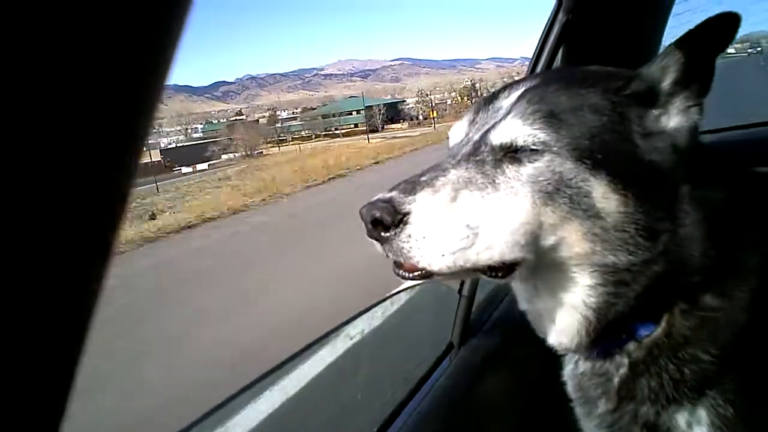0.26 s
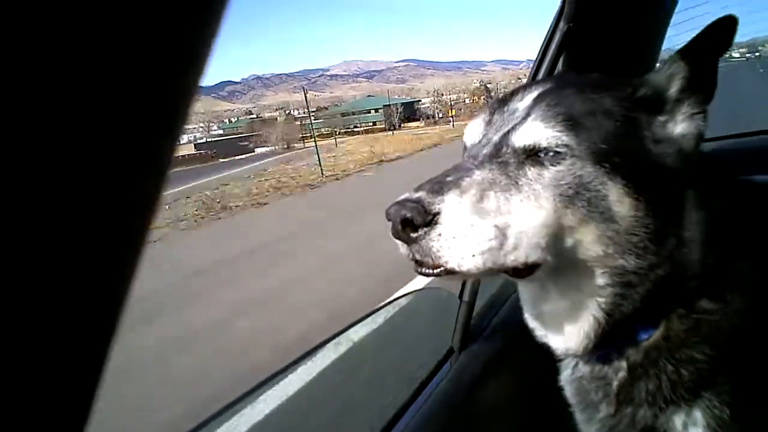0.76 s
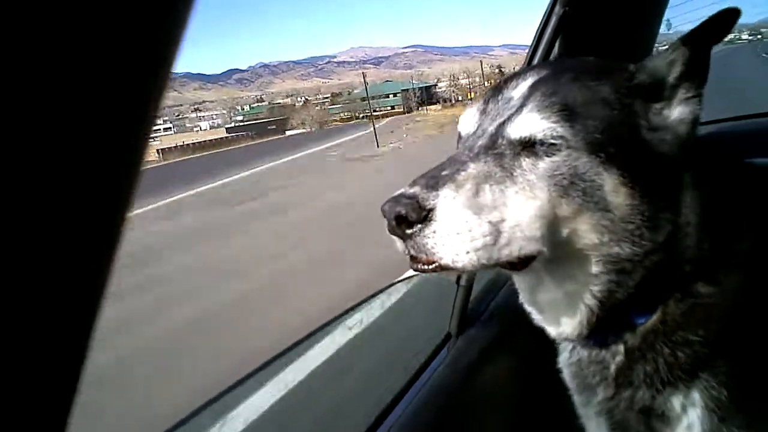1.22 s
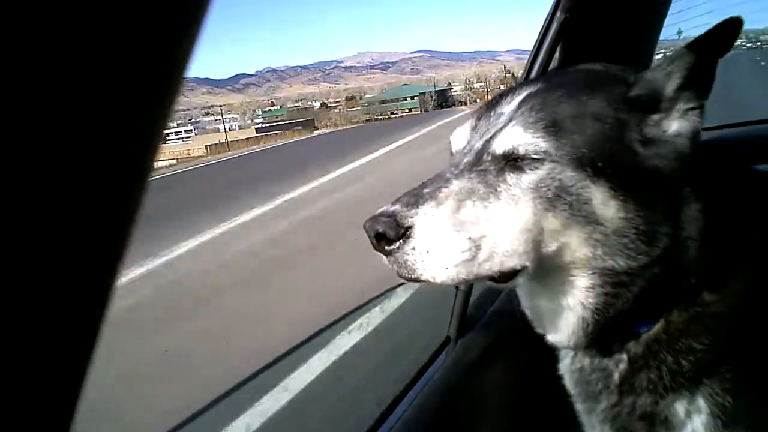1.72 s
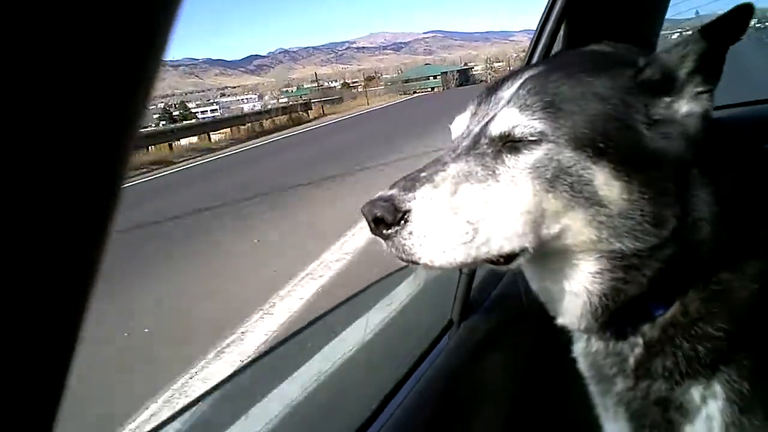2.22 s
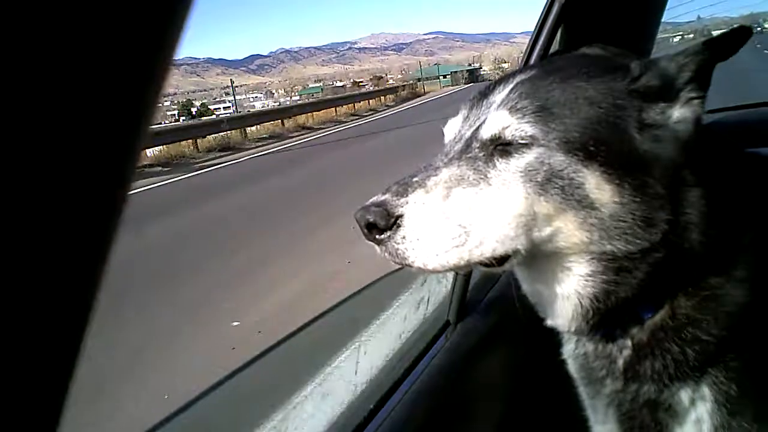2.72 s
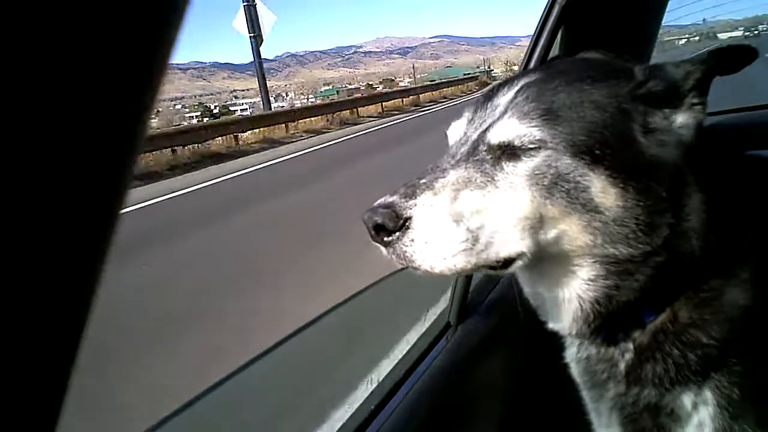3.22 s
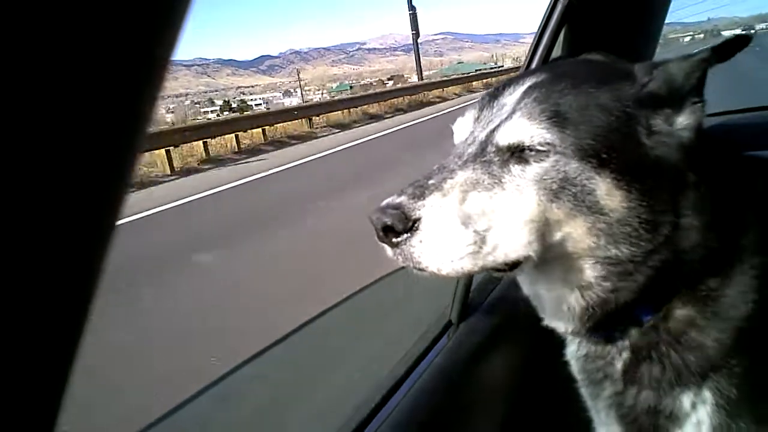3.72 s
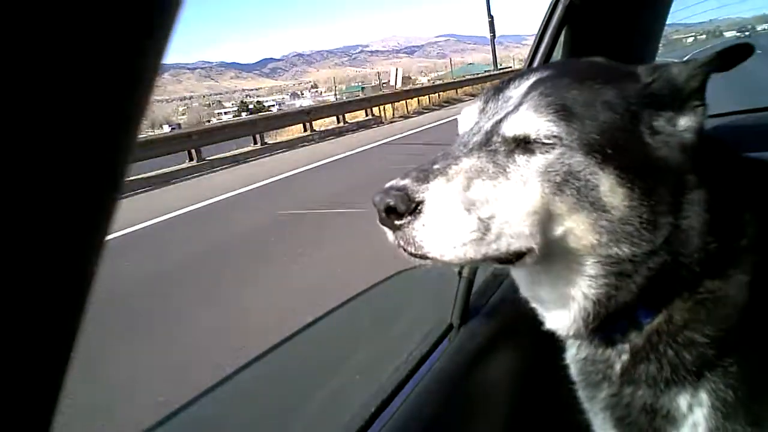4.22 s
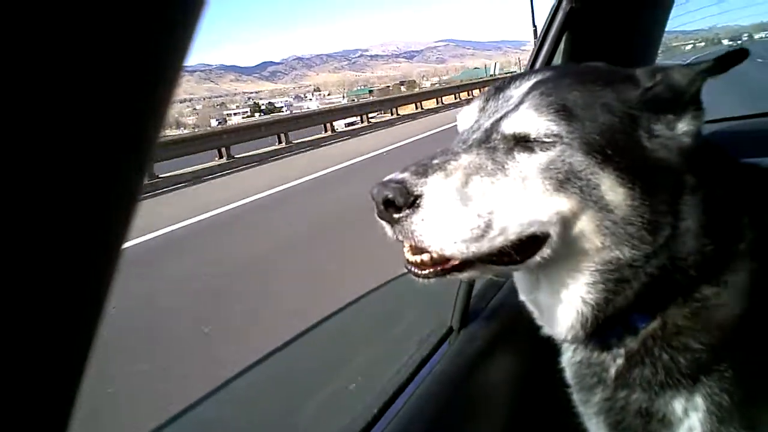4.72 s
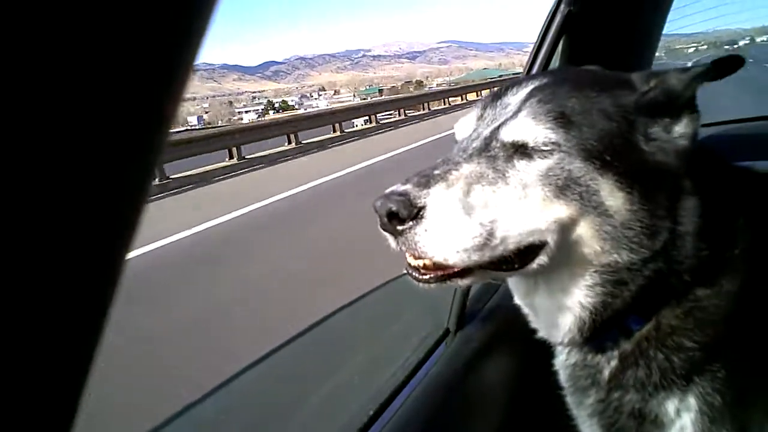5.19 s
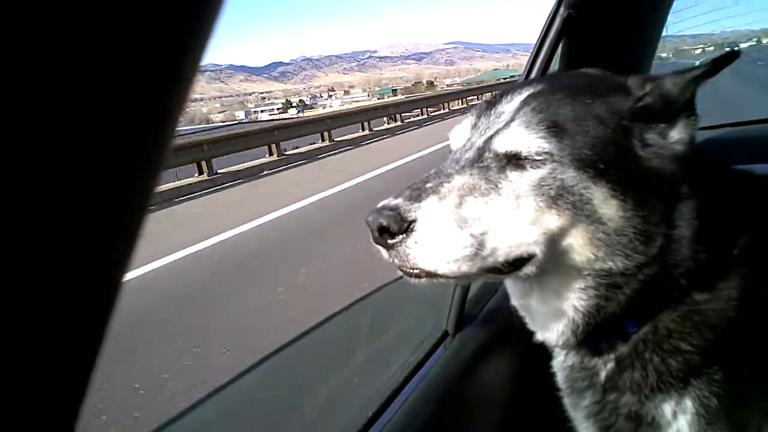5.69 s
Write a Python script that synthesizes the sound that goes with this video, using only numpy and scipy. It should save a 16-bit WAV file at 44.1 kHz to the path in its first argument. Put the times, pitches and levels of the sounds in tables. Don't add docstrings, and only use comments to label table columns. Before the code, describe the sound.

Continuous turbulent air roars past an open car window, fluttering rapidly and heard very close. Tyres make a steady midrange wash, the window edge hisses in gusts. Hard blows hit the microphone near 0.8, 3 and 4.8 seconds, with short low cabin thuds. Tiny spits and ticks scatter through the later part. The deep rumble is thin, and the dog stays silent.

```python
import sys
import numpy as np
from scipy import signal
from scipy.fft import rfft, irfft, next_fast_len
from scipy.io import wavfile
from scipy.ndimage import uniform_filter1d, map_coordinates

SR = 44100
rng = np.random.default_rng(int(sys.argv[2]) if len(sys.argv) > 2 else 0)


def nominal_scale(level):
    x = np.asarray(level, float) / 20
    return 10 ** x


def store_wav(level_fs):
    pcm = np.round(np.clip(np.atleast_2d(level_fs), -1, 1) * 32767)
    wavfile.write(sys.argv[1], SR, pcm.T.astype(np.int16))


N = 262395
WIND_FILTER_HZ, WIND_FILTER_Q = 232, 0.89

# (frequency [Hz], density [dB per Hz])
SEAL_COLOUR = [(2000, -30), (3000, 4.5), (4000, -3), (5500, -7), (7500, -16), (10000, -18), (13000, -40)]


def unit(x):
    return x / np.sqrt(np.mean(x ** 2) + 1e-20)


def wobble(rate):
    knots = rng.standard_normal(int(N * rate / SR) + 4)
    return unit(map_coordinates(knots, [np.arange(N) * rate / SR]))


def quick(rate):
    x = wobble(rate)
    return unit(x - uniform_filter1d(x, size=SR // 9))


def filtered(x, response):
    m = next_fast_len(N + 8192)
    return irfft(rfft(x, m) * response(np.fft.rfftfreq(m, 1 / SR)), m)[:N]


def wind_filter(hz):
    u = 1j * hz / WIND_FILTER_HZ
    return u * u / (u * u + u / WIND_FILTER_Q + 1)


def rush(spectrum, patchy_db, lumps_db):
    z = signal.stft(rng.standard_normal(N), nperseg=512)[2]
    field = uniform_filter1d(rng.standard_normal(z.shape), size=6, axis=0)
    field = uniform_filter1d(field, size=8, axis=1)
    noise = signal.istft(z * nominal_scale(patchy_db * unit(field)), nperseg=512)[1][:N]
    f, db = np.transpose(spectrum)

    def colour(hz):
        return nominal_scale(np.interp(np.log(hz + 1), np.log(f), db, -120, -120))

    x = filtered(noise * nominal_scale(lumps_db), colour)
    return x / np.std(filtered(x, wind_filter))


def stream():
    # (time [s], strength [dB], brightness [dB])
    drift = [
        (0.0, 5.5, 0.3),
        (0.99, 1.0, 0.7),
        (1.98, -1, -0.8),
        (2.98, -1.03, -0.86),
        (3.97, -4.5, 1.2),
        (4.96, -2.13, 0.5),
        (5.95, -2.26, 0.5),
    ]
    # (middle [s], length [s], rise [dB], brightness [dB])
    gusts = [(0.5, 0.31, 2.7, -0.6), (0.77, 0.059, 3, -1.5), (0.79, 0.081, 4.2, -1), (0.94, 0.18, 5, 0.5),
             (1.29, 0.051, 1.5, -1.5), (1.5, 0.14, 1.5, -1), (1.81, 0.3, 7, -0.1), (1.95, 0.13, 3.5, -0.8),
             (2.01, 0.18, 5.5, 1), (2.06, 0.094, 5, 0.0), (2.21, 0.13, 1.5, 2.5), (2.52, 0.35, -3, 1.2),
             (2.66, 0.064, 4, -0.7), (2.86, 0.048, 5, 0.5), (2.94, 0.071, 3.5, 0), (2.98, 0.061, 5.5, -1),
             (3.15, 0.11, 4.5, -0.5), (3.36, 0.4, -3, 0.4), (3.53, 0.083, 4.5, 0.3),
             (3.69, 0.06, 0.2, -3.5), (3.76, 0.08, 2, -2.7), (3.86, 0.11, -3, -5.5), (3.95, 0.11, 3, -1.5),
             (4.35, 0.089, 4.5, -1.5), (4.49, 0.18, 5.5, -0.2), (4.67, 0.16, 6.5, -0.8),
             (4.79, 0.22, 8, -2), (5.27, 0.19, 4, -1.5), (5.42, 0.15, 4, 0.5), (5.89, 0.27, 5, -1.7)]
    # (middle [s], length [s], rise [dB], brightness [dB])
    lulls = [
        (1.106, 0.066, -4, 1),
        (1.587, 0.12, -2, -1.5),
        (2.123, 0.065, -2, 1),
        (4.038, .05, -3, 0),
        (4.412, .05, 0, -3),
        (4.885, 0.052, -3.5, 2.5),
    ]
    t = np.arange(N) / SR
    s, *curves = np.transpose(drift)
    strength_db, bright_db = (np.interp(t, s, curve) for curve in curves)
    for middle, length, rise_db, tilt_db in [*gusts, *lulls]:
        swell = np.cos(np.pi * np.clip((t - middle) / length, -.5, .5)) ** 2
        strength_db = strength_db + rise_db * swell
        bright_db = bright_db + tilt_db * swell
    return strength_db, bright_db


def road_rumble():
    # (frequency [Hz], density [dB per Hz])
    floor_colour = [(12, -10), (25, 8), (40, 0), (70, -12), (120, -38)]
    return nominal_scale(-74) * rush(floor_colour, patchy_db=0.5, lumps_db=0)


def airflow():
    # (frequency [Hz], density [dB per Hz])
    buffet_colour = [(20, -28), (45, 0), (70, 2.5), (100, -0.5), (150, -4), (210, -5), (280, -4.5),
                     (380, -8), (480, -17.5), (900, -54)]
    roar_colour = [(200, -48), (350, -7.5), (450, -0.5), (600, -2), (820, -1.5), (1000, -5.5), (1300, -15),
                   (2200, -39)]
    tyre_colour = [(600, -12), (1000, -2.5), (1300, -2), (1700, -1.5), (2100, -6.5), (2700, -17),
                   (4000, -36)]
    edge_colour = [(1500, -13), (2700, -3), (3500, 0.5), (4300, -6.5), (5000, -6), (6000, -10.5),
                   (7000, -8), (8300, -13), (10000, -18), (12000, -27.5), (13500, -28.5), (16000, -31)]
    # (mean level [dB], share of strength [dB per dB], share of brightness [dB per dB])
    layers = [
        (-44, 0.93, -0.66),
        (-45.5, 0.97, -0.41),
        (-51.5, 0.86, 0.24),
        (-58.5, 1.03, 1.2),
    ]
    strength_db, bright_db = stream()
    buffet_db, roar_db, tyre_db, edge_db = (
        db + grows * strength_db + tilts * bright_db for db, grows, tilts in layers)
    eddies = quick(35)
    flutter = quick(80) + 0.93 * quick(200)
    buffet_lumps_db = 0.99 * eddies + 0.36 * quick(30) + 0.63 * flutter
    roar_lumps_db = 0.38 * eddies + 0.87 * flutter
    tyre_lumps_db = 0.29 * eddies + 0.44 * flutter + 0.36 * quick(50)
    edge_lumps_db = 0.056 * eddies + 0.82 * flutter
    buffet = nominal_scale(buffet_db) * rush(buffet_colour, patchy_db=0.8, lumps_db=buffet_lumps_db)
    roar = nominal_scale(roar_db) * rush(roar_colour, patchy_db=0.13, lumps_db=roar_lumps_db)
    tyres = nominal_scale(tyre_db) * rush(tyre_colour, patchy_db=0.04, lumps_db=tyre_lumps_db)
    edge = nominal_scale(edge_db) * rush(edge_colour, patchy_db=0.7, lumps_db=edge_lumps_db)
    return buffet + roar + tyres + edge


def slaps():
    # (time [s], peak [dB], width [ms])
    hard_slaps = [(0.2324, -26, 0.34), (0.3462, -27, 0.54), (0.3964, -25, 0.61), (0.4703, -26, 0.61),
                  (0.7667, -23, 0.54), (0.7724, -17, 0.43), (0.7783, -23, 0.5), (0.9096, -26, 0.34),
                  (0.9319, -26, 0.5), (0.968, -26, 0.57), (1.2756, -27, 0.52), (1.2906, -24, 0.68),
                  (1.4894, -26, 0.93), (1.5333, -28, 0.79), (1.7338, -26, 0.75), (1.8083, -25, 0.48),
                  (1.9683, -26, 0.39), (2.0241, -25, 0.61), (2.6702, -29, 0.57), (2.8596, -28, 0.73),
                  (2.9812, -22, 0.41), (2.9857, -20.5, 0.8), (3.1035, -28, 0.39), (3.5333, -30, 0.5),
                  (4.6345, -28, 0.48), (4.7266, -28, 0.41), (4.7717, -23, 0.57), (4.7996, -26, 1.38),
                  (4.8258, -24, 0.66), (5.8051, -30, 0.68)]
    pat_count, pat_db, pat_ms = 24, -32, .55
    strength_db = stream()[0]
    pats = []
    for u, v, w in rng.random((pat_count, 3)):
        level_db = pat_db + strength_db[int(u * N)].clip(-5, 3) + 3 * (v - .5)
        pats.append((.05 + u * (N / SR - .1), level_db, pat_ms * 2 ** (w - .5)))
    blows = [*hard_slaps, *pats]
    out = np.zeros(N + SR)
    t = np.arange(-SR // 200, SR // 100) * 1000 / SR
    for (s, db, width_ms), side in zip(blows, rng.choice([-1, 1], len(blows))):
        force = max(db + 26, 0)
        spread = width_ms * np.where(t < 0, 1.2, 2.2 + .2 * force)
        swing = np.exp(-(t / spread) ** 2) * np.cos(1.9 * t / width_ms)
        swing += .3 * np.exp(-(t / 1.6) ** 2) * np.cos(1.7 * t)
        out[round(s * SR) - SR // 200:][:len(t)] += side * nominal_scale(db - 4 + .3 * force) * swing
    return out[:N]


def thuds():
    # (time [s], peak [dB])
    booms = [(.6, -35.5), (.777, -29.5), (1.307, -37), (1.46, -31), (2.413, -38), (2.986, -27),
             (3.587, -37), (3.741, -43), (3.937, -33.5), (4.136, -35.5), (4.334, -41), (4.797, -25.5),
             (5.719, -37)]
    boom_hz, boom_ms = 126, 9.7
    out, t = np.zeros(N), np.arange(N) / SR
    for (s, db), (u, v) in zip(booms, rng.random((len(booms), 2))):
        envelope = np.exp(-(1000 * (t - s) / boom_ms) ** 2)
        pitch_hz = boom_hz * (0.87 + 0.36 * u)
        out += nominal_scale(db) * envelope * np.cos(2 * np.pi * (pitch_hz * (t - s) + v))
    return out


def spits():
    # (time [s], peak [dB], length [ms])
    bursts = [(0.7848, -37, 4.3), (1.6392, -46, 5.5), (2.5174, -45, 5.4), (2.608, -44, 4.2),
              (2.6269, -47, 5), (3.2266, -49, 4.5), (3.4984, -41.5, 4.7), (3.7534, -48, 5), (3.92, -46, 5),
              (4.0836, -43.5, 4.7), (4.1964, -46, 5.6), (4.341, -44, 5.6), (4.6154, -44, 5),
              (5.5264, -51, 5)]
    gate, t = np.zeros(N + SR), np.arange(SR // 40) / SR
    for s, db, length_ms in bursts:
        swell = np.sin(np.pi * np.minimum(1000 * t / length_ms, 1))
        gate[round(s * SR):][:len(t)] += nominal_scale(db - 7.5) * swell
    return gate[:N] * rush(SEAL_COLOUR, patchy_db=1.5, lumps_db=0)


def ticks():
    # (time [s], push [dB], ping [dB])
    grains = [(1.088, -34, -68), (2.739, -45, -66), (2.9698, -50, -63), (2.9871, -35, -70),
              (3.2007, -50, -63), (3.207, -34, -70), (3.247, -46, -70), (3.7615, -33, -80),
              (3.8284, -45, -85), (3.8956, -32, -75), (3.9345, -37, -72), (3.9394, -30, -50),
              (3.9911, -34, -67), (4.3492, -38, -80), (4.6953, -45, -64), (4.724, -50, -65),
              (4.7704, -38, -58), (4.908, -40, -80), (4.92, -41, -80), (4.9366, -33, -72),
              (5.4527, -41, -80)]
    out, t = np.zeros(N + SR), np.arange(SR // 500) / SR
    push = (t / .00008) ** 2 * np.exp(2 - t / .00004)
    ping = np.sin(2 * np.pi * 13800 * t) * np.exp(-t / .00008)
    for (s, push_db, ping_db), side in zip(grains, rng.choice([-1, 1], len(grains))):
        grain = nominal_scale(push_db) * push + nominal_scale(ping_db + 12) * ping
        out[round(s * SR):][:len(t)] += side * grain
    return out[:N]


def scene():
    return (road_rumble() + airflow() + slaps() + thuds() + spits() + ticks())[None]


def band_limit(x):
    return signal.sosfilt(signal.butter(12, 15710, fs=SR, output="sos"), x)


def record(dry):
    # (frequency [Hz], density [dB per Hz])
    circuit_colour = [(200, -20), (2000, 0), (11000, 0), (16000, -2)]
    # (time [s], length [ms])
    surges = [(0.3186, 3.2), (0.4874, 5.0), (0.6815, 2.7), (2.0324, 2.2), (2.0624, 2.5), (2.0781, 6.2),
              (2.0925, 7.0), (2.879, 6.7), (2.99, 3.7), (3.7211, 6.5), (4.6719, 2.7), (4.6904, 4.5),
              (4.7078, 6.5), (4.8066, 2.2), (5.2581, 2.5), (5.4237, 9.2), (5.871, 4.5)]
    hiss = nominal_scale(-85.0) * rush(circuit_colour, patchy_db=1.0, lumps_db=0)
    steps = np.diff(dry[0] + hiss, prepend=0)
    kick = np.hanning(14)
    for (s, length_ms), side in zip(surges, rng.choice([-1, 1], len(surges))):
        start, end = round(s * SR), round((s + length_ms / 1000) * SR)
        steps[start:end] = 0
        steps[end:end + len(kick)] += side * nominal_scale(-52.0) * kick
    late_hiss = nominal_scale(-77) * rush(SEAL_COLOUR, patchy_db=.3, lumps_db=0)
    mix = filtered(np.cumsum(steps), wind_filter) + late_hiss
    return band_limit(mix[None])


dry = scene()
out = record(dry)
store_wav(out)
```